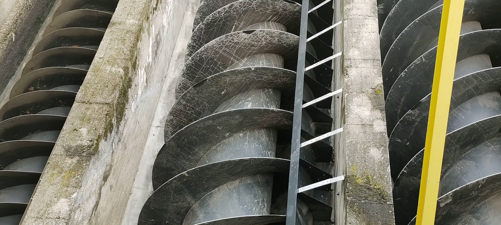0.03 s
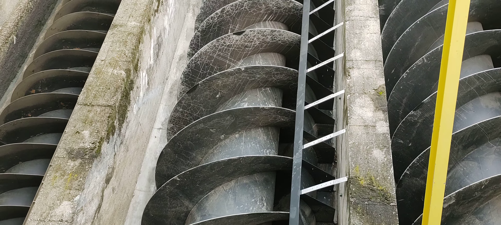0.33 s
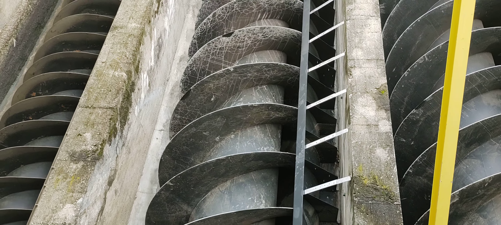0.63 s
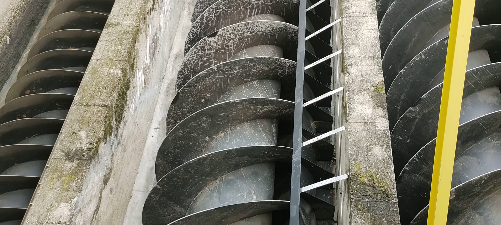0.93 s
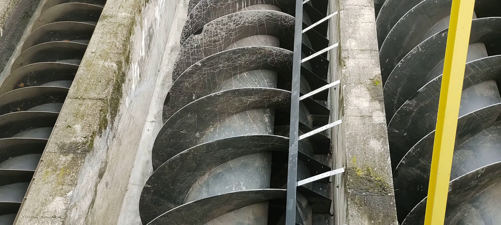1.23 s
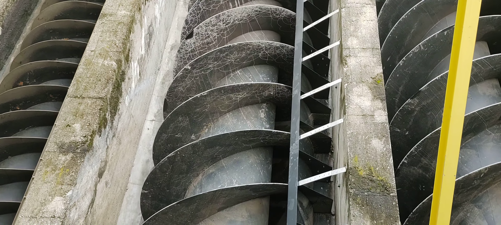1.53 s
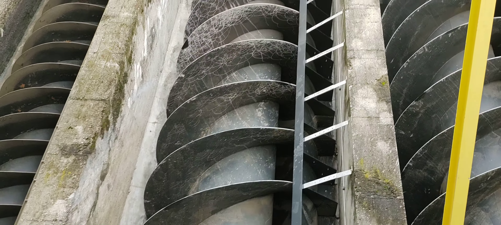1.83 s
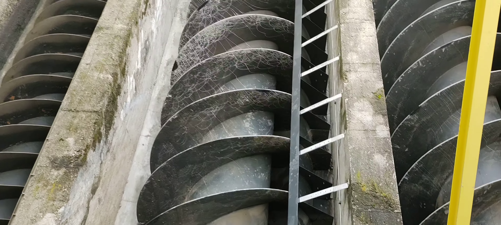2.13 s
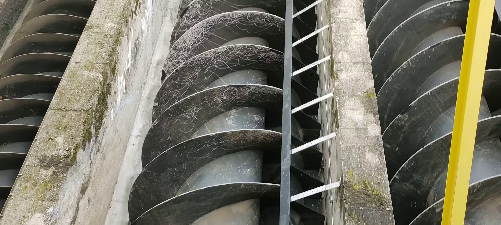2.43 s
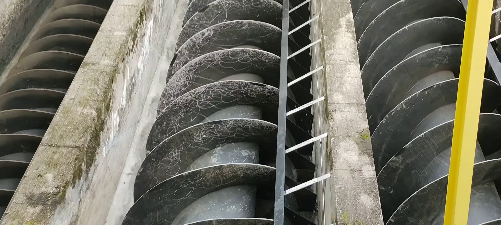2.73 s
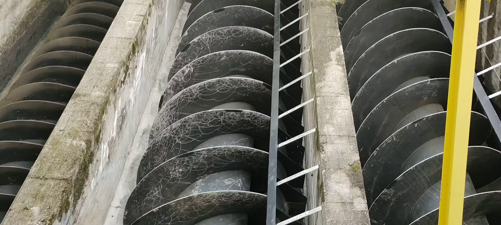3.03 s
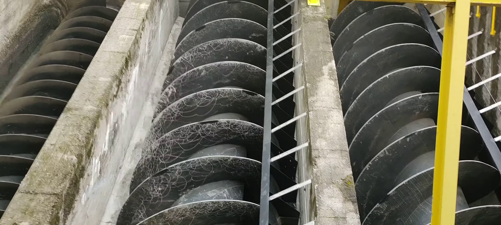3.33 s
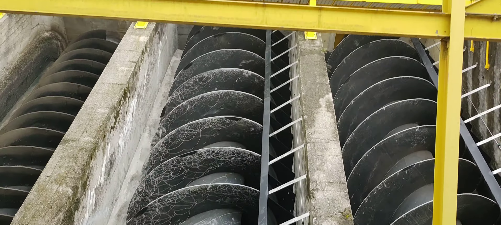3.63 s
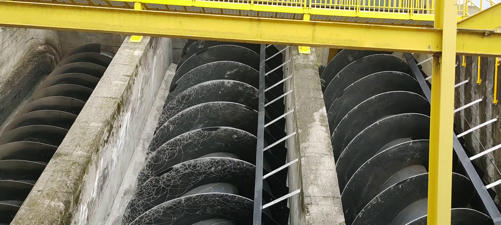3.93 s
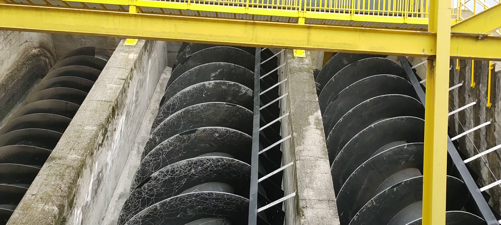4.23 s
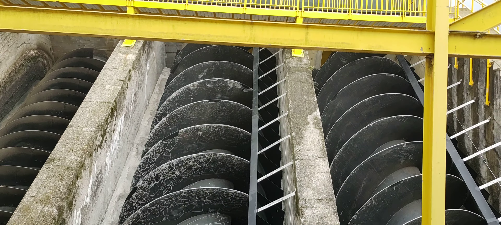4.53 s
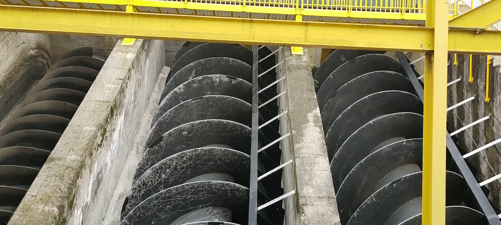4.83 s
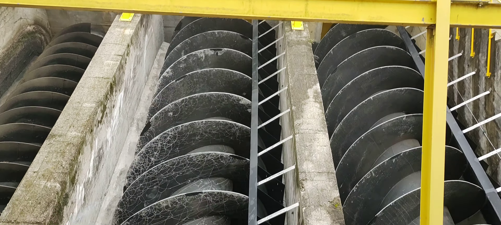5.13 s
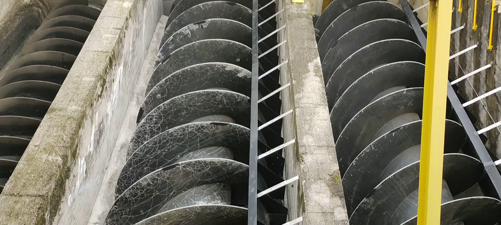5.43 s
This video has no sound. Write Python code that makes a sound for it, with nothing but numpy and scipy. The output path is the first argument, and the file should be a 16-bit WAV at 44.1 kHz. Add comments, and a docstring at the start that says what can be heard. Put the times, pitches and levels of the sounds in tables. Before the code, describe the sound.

Large screw pumps churn water up open concrete channels, a steady rush of bubbling and hissing spray with a faint motor hum and thin gear whine underneath. For the first two seconds, gusts of wind rumble and thump on the microphone. Then the wind eases and the water drops to a quieter, more distant rush. A few tiny finger ticks touch the microphone's case.

```python
"""Large screw pumps lift water up open concrete channels at a treatment plant.
Their turning blades churn up bubbles and spray, loud at first and then farther off, and water
slaps back on the steel. Underneath, two motors hum and their gears whine faintly.
Gusts of wind rumble and thump on the microphone, and fingers make small ticks on its case."""
import sys
import numpy as np
from scipy import signal
from scipy.fft import rfft, irfft
from scipy.io import wavfile
from scipy.ndimage import uniform_filter1d

SR = 44100
rng = np.random.default_rng(int(sys.argv[2]) if len(sys.argv) > 2 else 0)


def to_wav(s):
    """Save 16-bit WAV."""
    ch = np.atleast_2d(s).T  # columns
    pcm = np.round(np.clip(ch, -1, 1) * 32767)  # PCM
    wavfile.write(sys.argv[1], SR, pcm.astype(np.int16))


N = 250929
TIME = np.arange(N) / SR
START_S = .367   # silent until here


def from_db(db):
    """Turn decibels into a number to multiply a sound by."""
    return 10 ** (np.asarray(db) / 20)


def rms_one(x):
    """Scale a signal so that its average strength (rms) is 1."""
    return x / np.sqrt(np.mean(x ** 2) + 1e-20)


def in_time(rows):
    """Join (time, value) points with straight lines, giving a value for every sample."""
    times, values = np.transpose(rows)
    return np.interp(TIME, times, values)


def drift(rate_hz):
    """A smooth random wobble of typical size 1; a higher rate wobbles faster."""
    step, warm_up = 40, 2000   # one point every 40 samples; the first 2000 points are dropped
    r = np.exp(-2 * np.pi * step * rate_hz / SR)
    noise = rng.standard_normal(N // step + warm_up + 2)
    slow = signal.lfilter([1], [1, -2 * r, r * r], noise)[warm_up:]
    return np.interp(np.arange(N) / step, np.arange(len(slow)), rms_one(slow))


def colour(x, spectrum):
    """Shape a sound's bass and treble along a curve, fading steeply past its ends; strength 1."""
    hz, db = np.transpose(spectrum)
    freqs = np.maximum(np.fft.rfftfreq(N, 1 / SR), 1)
    edges = np.minimum(freqs / hz[0], 1) ** 3 * np.minimum(hz[-1] / freqs, 1) ** 6
    curve = from_db(np.interp(np.log(freqs), np.log(hz), db))
    return rms_one(irfft(rfft(x) * edges * curve, N))


def resonate(x, hz, width_hz):
    """Make a sound ring at one pitch; a narrower width rings longer."""
    r = np.exp(-np.pi * width_hz / SR)
    feed = np.array([1, 0, -1]) * (1 - r * r) / 2
    feedback = [1, -2 * r * np.cos(2 * np.pi * hz / SR), r * r]
    return signal.lfilter(feed, feedback, x + 1e-18)


def ring(x, hz, width_hz):
    """Resonate twice, so that less is left away from the pitch."""
    return resonate(resonate(x, hz, width_hz), hz, width_hz)


def noisy_tones(rows):
    """Unsteady tones, each made by letting noise ring at one pitch."""
    return sum(from_db(db) * rms_one(ring(rng.standard_normal(N), hz, width)) for hz, width, db in rows)


def add_at_peak(out, start_s, sound, peak_db):
    """Mix in a short sound with its highest point set to peak_db."""
    at = int(start_s * SR)
    scaled = from_db(peak_db) * sound / np.abs(sound).max()
    out[at:at + len(sound)] += scaled[:N - at]


def bubbles(per_s, low_hz, high_hz, cycles, size_db, count=20):
    """Bubbles and drops of random size, each ringing for a few cycles; strength 1."""
    sizes = from_db(size_db * np.minimum(rng.exponential(1, N), 4)) * rng.choice([-1, 1], N)
    clicks = sizes * (rng.random(N) < per_s / SR)
    which_pitch = rng.integers(0, count, N)
    pitches = np.geomspace(low_hz, high_hz, count)
    pops = sum(resonate(clicks * (which_pitch == k), hz, hz / cycles) for k, hz in enumerate(pitches))
    return rms_one(pops)


def water(level_db):
    """The blades churn up bubbles and throw spray; both surge together with the channels' ringing."""
    # tone of the deep churning: pitch_hz, relative_db
    churn_tone = [(30, -37.5), (55, -24), (85, -4.5), (150, -3), (210, -1), (280, -1.5), (450, -3.5),
                  (600, -3.5), (900, -5), (1200, -7.5), (1550, -8.5), (2000, -19)]
    # tone of the hissing spray: pitch_hz, relative_db
    spray_tone = [(1600, -5), (2000, -1.5), (2500, -2), (2950, -4.5), (3350, -12.5), (3800, -16.5),
                  (4900, -16.5), (5600, -21), (6400, -25.5), (7400, -23), (7750, -28.5), (8050, -45.5),
                  (8400, -47.5)]
    # hollow ringing of the channels: pitch_hz, width_hz, level_db (relative to the water)
    channel_rings = [(327.6, 20, -11.5), (513.3, 44, -14), (657.4, 29, -16.5), (1416, 130, -16.5)]
    churn_db, spray_db = 1.68, -7   # relative to the water
    surge_db = 0.52 * drift(6.7)
    gurgle = bubbles(per_s=2500, low_hz=299.3, high_hz=2050, cycles=9.9, size_db=2.5)
    fizz = bubbles(per_s=7000, low_hz=1650, high_hz=7300, cycles=4.3, size_db=0.5)
    churn = colour(rng.standard_normal(N) + from_db(-12.5) * gurgle, churn_tone)
    churn *= from_db(churn_db + 0.1 * drift(5.6))
    spray = colour(rng.standard_normal(N) + from_db(-9.5) * fizz, spray_tone)
    spray *= from_db(spray_db + 0.17 * drift(20))
    return from_db(level_db + surge_db) * (churn + spray + noisy_tones(channel_rings))


def drives(water_db):
    """Two motors hum and waver; their gear whine comes down the channels with the water."""
    # whine of the gears: pitch_hz, width_hz, level_db (relative to the water)
    gear_whine = [(1749, 5, -24), (2099, 5, -26.5), (2448, 5, -28.5), (4141, 8, -41), (4548, 7, -40.5),
                  (4968, 16, -34)]
    hum_hz, hum_db = 119.4, -48   # first motor, when the water is at its average level
    follow_share = 0.62   # the hum follows this much of the water's rise and fall in dB
    # The second motor runs slightly faster, so it partly cancels the first once per slow beat.
    second_db, beat_hz, dip_s = -2.5, 0.41, 3.5
    phase = 2 * np.pi * np.cumsum(hum_hz + 0.23 * drift(1.6)) / SR
    lead = 2 * np.pi * beat_hz * (TIME - dip_s)
    motors = np.sqrt(2) * (np.sin(phase) - from_db(second_db) * np.sin(phase + lead))
    motors_db = hum_db + follow_share * (water_db - water_db.mean()) + 0.46 * drift(2.3)
    return from_db(motors_db) * motors + from_db(water_db) * noisy_tones(gear_whine)


def wind_strength():
    """Each gust rises, holds and dies away on top of the breeze."""
    # light breeze between the gusts: time_s, level_db
    breeze = [(.4, -39.5), (2.55, -43), (3.3, -56), (4.0, -52), (5.69, -49)]
    # gusts on the microphone: start_s, hold_s, level_db
    gusts = [(0.48, .02, -28), (0.602, 0.028, -29.5), (0.688, 0.21, -29), (0.847, 0.22, -28.5),
             (1.127, 0.1, -32.5), (1.292, 0.029, -26.5), (1.407, 0.053, -37.5), (1.792, 0.153, -30.5),
             (1.988, 0.024, -31.5), (2.081, 0.096, -33), (2.621, 0.045, -38), (5.42, 0.11, -41.5)]
    rise_s, fade_s = 0.029, 0.022
    power = from_db(in_time(breeze)) ** 2
    for start_s, hold_s, level_db in gusts:
        rise = np.clip(1 + (TIME - start_s) / rise_s, 0, 1)
        fall = np.exp(-np.maximum(TIME - start_s - hold_s, 0) / fade_s)
        power += (from_db(level_db) * rise * fall) ** 2
    return np.sqrt(power)


def wind():
    """Rough air rumbles on the microphone; each swirl is a brief suck that sets its bass filter ringing."""
    # tone of the wind's rumble: pitch_hz, relative_db
    rumble_tone = [(25, -34.5), (42, -25.5), (60, -13.5), (85, -1.5), (125, -0.5), (190, -6.5),
                   (235, -15.5), (320, -14.5), (480, -34)]
    # the hardest swirls of air hitting the microphone: time_s, peak_db, half_width_ms
    hard_swirls = [(.545, -17.5, 1.54), (.598, -18, 2.1), (.685, -16.5, 2.1), (.763, -13.5, 2.3),
                   (.878, -12, 1.64), (.926, -16.5, 2), (1.032, -11.5, 2), (1.299, -15, 2.85),
                   (1.856, -18, 2.8), (1.895, -16.5, 2.7), (2.127, -12.5, 1.05), (2.174, -22, 4.6),
                   (5.505, -27, 1.8)]
    swirls_per_s, above_wind_db, swirl_ms = 12, 7, 1.64   # smaller swirls, at random times
    strength = wind_strength()
    rumble = colour(rng.standard_normal(N), rumble_tone)
    rumble /= np.sqrt(uniform_filter1d(rumble ** 2, size=SR // 40) + 1e-9)   # even out its own swells
    out = strength * rumble
    swirl_samples = np.flatnonzero((rng.random(N) < swirls_per_s / SR) & (TIME > START_S))
    small_swirls = [(TIME[i], above_wind_db + 20 * np.log10(strength[i]), swirl_ms)
                    for i in swirl_samples]
    around_s = np.arange(-(SR // 50), SR // 20) / SR
    bass_cut = signal.butter(4, 105, "high", fs=SR, output="sos")   # weakens sound below 105 Hz
    for time_s, peak_db, half_width_ms in hard_swirls + small_swirls:
        suction = -np.exp(-(1000 * around_s / half_width_ms) ** 2)
        add_at_peak(out, time_s + around_s[0], signal.sosfilt(bass_cut, suction), peak_db)
    return out


def finger_ticks():
    """A fingertip slips for a few milliseconds and rings the microphone's small case."""
    # finger ticks on the case: start_s, peak_db, fade_s
    ticks = [(0.608, -43.5, .003), (1.014, -49, .003), (1.889, -42, .014), (2.604, -53, .003),
             (3.886, -58, .004), (3.993, -54.5, .008), (4.025, -56, .003)]
    out, age = np.zeros(N), TIME[:SR // 10]
    for start_s, peak_db, fade_s in ticks:
        slip = rng.standard_normal(len(age)) * np.exp(-age / fade_s)
        add_at_peak(out, start_s, ring(slip, hz=7100, width_hz=950), peak_db)
    return out


def water_slaps():
    """Water falling back on the steel gives a short bright crack."""
    # sharp slaps of water: start_s, peak_db
    slaps = [(1.895, -42), (2.614, -43)]
    fade_s = 0.0066
    out, age = np.zeros(N), TIME[:SR // 20]
    for start_s, peak_db in slaps:
        burst = rng.standard_normal(len(age)) * np.exp(-age / fade_s)
        add_at_peak(out, start_s, ring(burst, hz=2900, width_hz=1700), peak_db)
    return out


def scene():
    """Pumps, wind and fingers, all heard at one microphone."""
    # loudness of the churning water, near and then farther off: time_s, level_db
    water_levels = [(.37, -41), (.62, -38.5), (1.82, -37), (2.5, -44.7), (3.1, -45.5), (3.6, -45),
                    (5.69, -45)]
    water_db = in_time(water_levels)
    mix = water(water_db) + water_slaps() + drives(water_db) + wind() + finger_ticks()
    return mix[None]


def record(dry):
    """The microphone opens after a moment, and the highest treble is cut steeply."""
    cutoff_hz = 8150
    treble_cut = signal.ellip(8, .2, 80, cutoff_hz, fs=SR, output="sos")
    return signal.sosfilt(treble_cut, dry * (TIME >= START_S))


dry = scene()
out = record(dry)
to_wav(out)
```